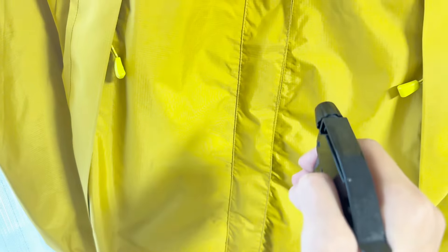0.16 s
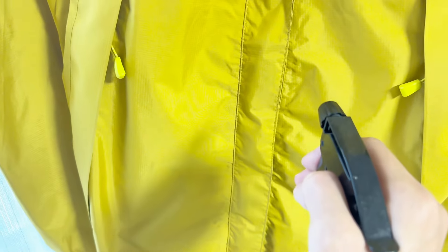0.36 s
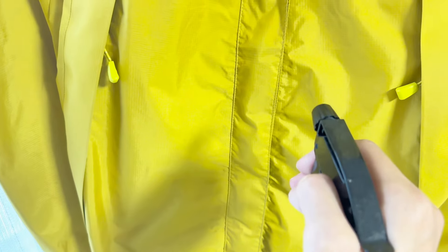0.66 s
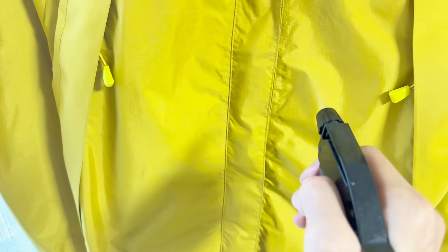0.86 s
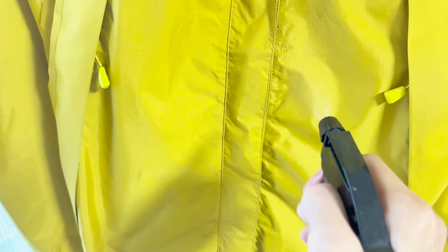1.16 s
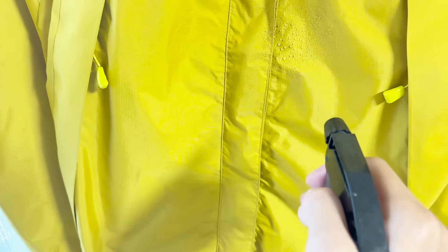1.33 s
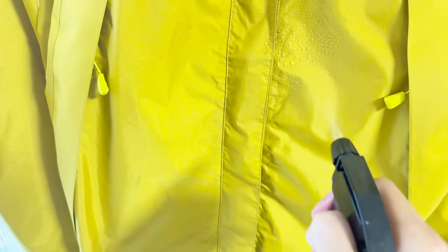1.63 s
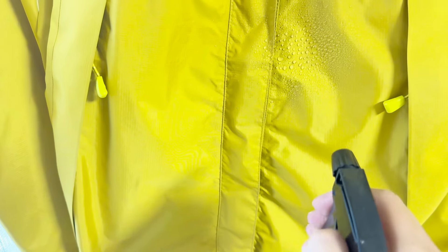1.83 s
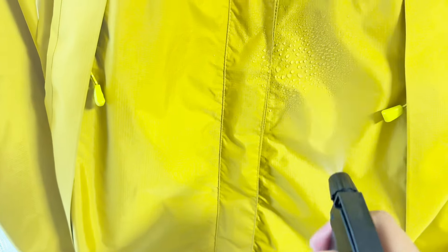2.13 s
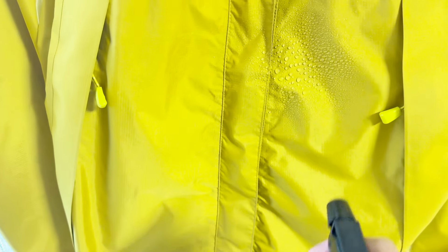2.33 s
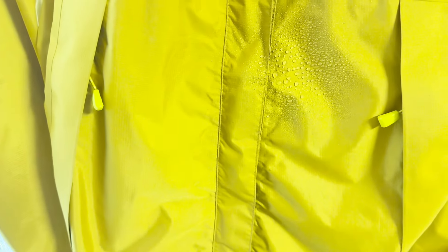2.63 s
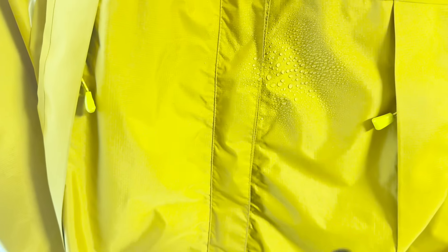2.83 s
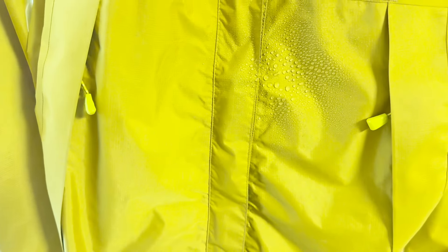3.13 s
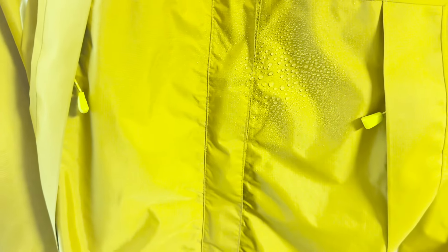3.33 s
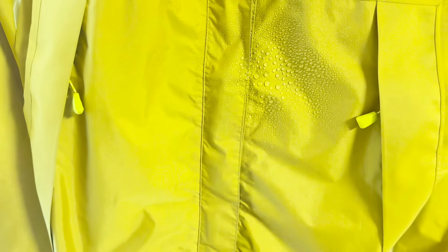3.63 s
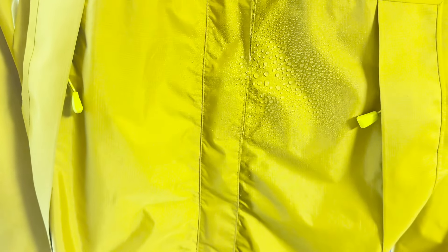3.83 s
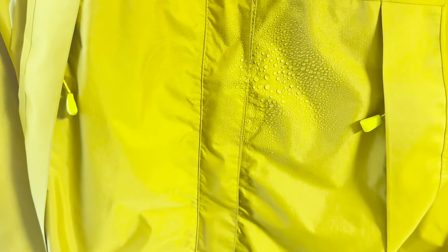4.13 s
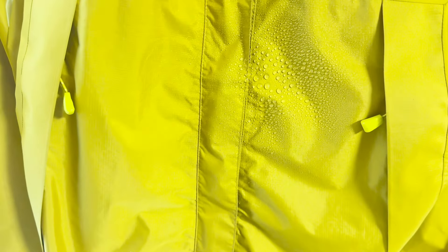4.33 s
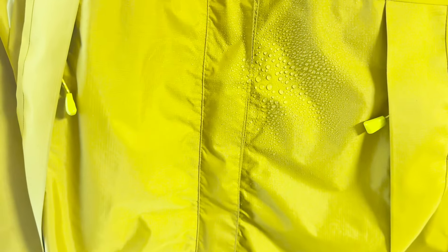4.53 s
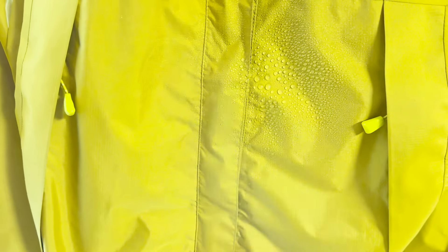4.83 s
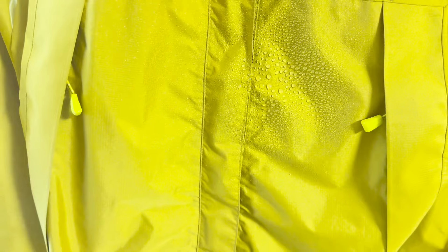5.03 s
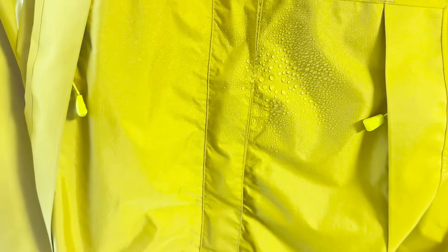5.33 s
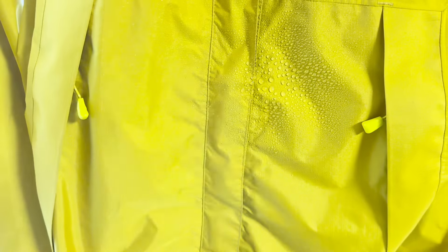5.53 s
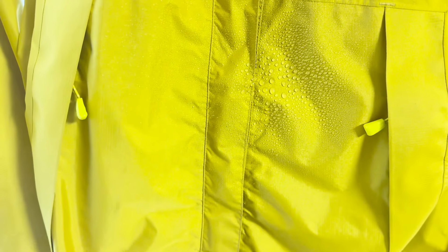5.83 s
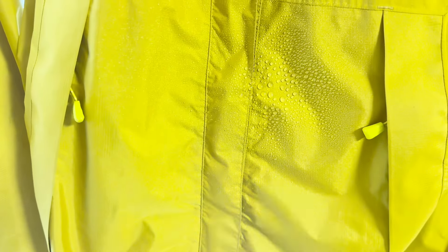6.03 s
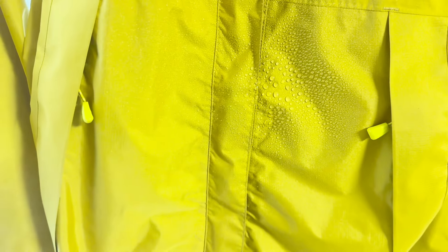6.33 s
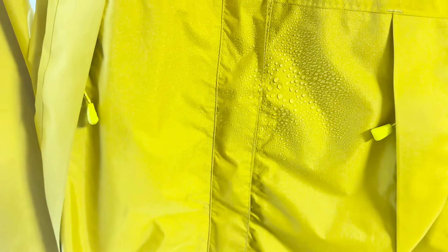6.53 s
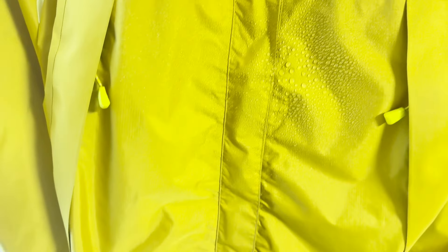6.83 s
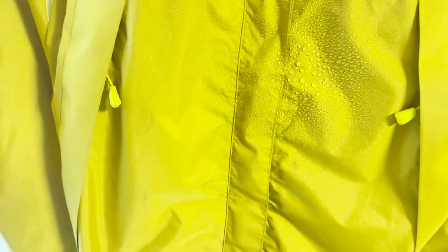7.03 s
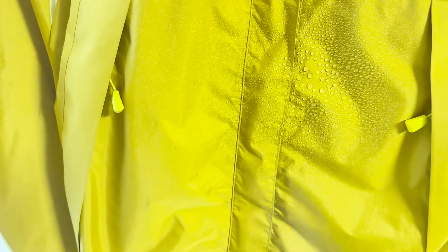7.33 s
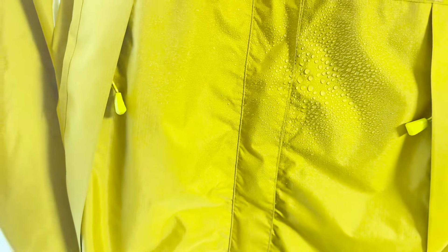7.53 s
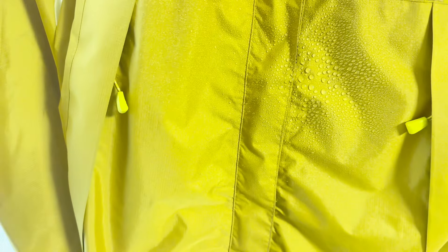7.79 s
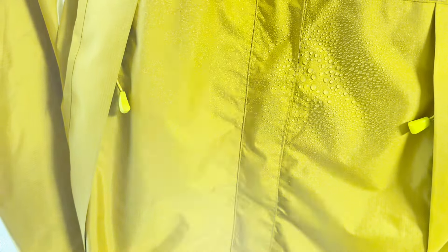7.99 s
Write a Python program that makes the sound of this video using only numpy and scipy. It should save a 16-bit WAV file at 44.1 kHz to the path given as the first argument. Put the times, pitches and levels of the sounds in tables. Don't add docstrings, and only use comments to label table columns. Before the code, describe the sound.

Close stereo phone pickup in a small room, beginning with faint air hiss and low street rumble. At about 0.7 seconds a hard plastic click starts the first trigger pull, a brief sputtering burst of air and water. More pulls come at 1.1, 1.5 and 2.1, spitting and clicking, with small wet crackles as the pump refills. A soft, bouncing low thud sounds in the building around 1.4. Cleaner, stronger hisses of mist follow at 2.9 and 3.5, with fine patter on nylon cloth, then a pause. Further squeezes come at 4.7, 5.4 and 6.0, each lasting roughly a quarter second and ending in a little suck or crackle. After another gap, sprays at 7.3 and 7.9 close the scene. Low machine hum swells around 5.6; traffic hiss rises near 6.4, and engine rumble is strongest at the end, about 8.2.

```python
import sys
import numpy as np
from scipy import signal
from scipy.fft import rfft, irfft, next_fast_len
from scipy.io import wavfile

SR = 44100
rng = np.random.default_rng(int(sys.argv[2]) if len(sys.argv) > 2 else 0)


def to_linear_factor(level_db):
    exponent = np.asarray(level_db, float) / 20
    return 10 ** exponent


def master_out(mix):
    frames = np.transpose(np.atleast_2d(mix))
    ceiling = np.clip(frames, -1, 1)
    pcm = np.round(ceiling * 32767).astype(np.int16)
    wavfile.write(sys.argv[1], SR, pcm)


N = 359718
TIME = np.arange(N) / SR
SLOW = TIME[::32]
HZ = np.maximum(np.fft.rfftfreq(2 * next_fast_len(N // 2 + SR // 8), 1 / SR), 1)

# pitch_hz, level_db (per Hz)
AIR_COLOUR = [(5000, -7.5), (7500, 0), (9000, -13), (13000, -11.5), (15000, -24.5)]
# pitch_hz, level_db (per Hz)
STREET_COLOUR = [(15, -37.5), (25, -13.5), (81, -0.5), (159, -11), (203, -11.5), (482, -19), (546, -24.5),
                 (1030, -21), (1240, -29.5), (2250, -29.5), (3400, -51.5), (4420, -70), (7480, -120)]
# pitch_hz, level_db (per Hz)
TYRE_HISS_COLOUR = [(1530, -32.5), (2600, 2.5), (3630, -7.5), (5080, -0.5), (7150, -5.5), (8510, -10.5),
                    (9990, -34.5), (11300, -34.5), (15100, -36.5), (16000, -32)]
# pitch_hz, likeness (-1 to 1)
STREET_LIKENESS = [(60, .98), (300, .86), (700, .55), (1500, .15), (4000, -.05), (8000, -.1), (10000, -.97),
                   (12000, -.5), (15000, .5)]
# pitch_hz, width_hz, boost_db
ROOM_MODES = [(61.6, 3.3, 12), (91.1, 2.7, 4), (129, 13, 7.5), (240, 9.1, -2.5)]
# time_s, level_db
ENGINES = [(0, -67.5), (.57, -62.5), (.79, -59), (1.18, -63), (1.43, -74), (1.6, -55.5), (2.68, -74.5),
           (3.34, -66.5), (3.7, -68.5), (4.2, -64), (4.6, -71.5), (5.2, -57.5), (5.7, -51.5), (6.04, -53),
           (6.5, -50.5), (7.3, -51.5), (7.6, -54.5), (8.157, -35.5)]
# time_s, level_db
TYRES = [(0, -77.5), (.6, -70), (1.4, -59), (1.95, -72.5), (2.45, -68.5), (2.67, -77), (3.3, -71.5),
         (4.05, -67.5), (4.5, -70.5), (5.15, -60), (5.3, -63), (5.95, -60), (6.37, -51), (6.6, -55),
         (7.0, -57.5), (7.3, -56), (7.7, -50), (8.157, -45)]
# middle_s, level_db, half_length_s
PASSES = [
    (2.5, -76, 0.064),
    (2.82, -76, .05),
    (3.95, -78.5, .12),
    (6.38, -50, 0.11),
    (6.8, -60.5, .12),
]
# pitch_hz, width_hz
HUM_LINES = [(200.2, 3.7), (307.1, 19), (88.2, 7), (1050, 500)]
# middle_s, level_db, half_length_s
HUM_SWELLS = [
    [(.82, -63.5, .25), (1.5, -64, 0.12), (2.18, -64, 0.14), (4.86, -59.5, 0.091), (5.6, -51.5, 0.18),
     (6.2, -55, 0.42), (6.9, -58, .3), (7.84, -40.5, 0.28)],
    [(.75, -61.5, 0.53), (1.57, -59, 0.17), (2.18, -60, .15), (4.9, -53.5, 0.12), (6.5, -63.5, 1),
     (8.1, -51.5, 0.37)],
    [(4.05, -63, 0.16), (5.1, -60, 0.18), (6.2, -47, 0.16), (6.75, -42, 0.1), (7.75, -39, 0.16),
     (8.1, -33, 0.19)],
    [(7.2, -59.5, 0.37), (7.8, -48.5, .25)],
]
# time_s, level_db
THUDS = [
    (1.376, -32),
    (1.404, -25),
    (1.443, -31.5),
    (1.47, -27.5),
    (1.514, -32.5),
    (1.939, -49.5),
    (5.2, -58),
]
# pitch_hz, level_db, time_to_fall_60_db_s
FLOOR_MODES = [(96.3, -7.5, 0.42), (133, -1.5, 0.29), (178.7, -11.5, 0.36), (853, -19.5, 0.071)]

# start_s, rise_s, hold_s, release_s (to lose 30 dB), hiss_level_db
PULLS = [(.742, 0.008, 0.023, .14, -33.5), (1.101, 0.0098, 0.064, 0.1341, -30.5),
         (1.5, 0.035, .05, 0.17, -30), (2.085, 0.027, 0.077, 0.1459, -27.5),
         (2.891, 0.062, 0.0334, 0.1618, -25.5), (3.501, 0.041, 0.028, 0.16, -25),
         (4.712, 0.051, 0.056, 0.1959, -28), (5.379, .05, 0.044, 0.1634, -28.5),
         (5.999, 0.036, 0.056, 0.1357, -25), (7.318, 0.051, 0.036, 0.18, -28.5),
         (7.933, 0.046, 0.048, 0.14, -24.5)]
# start_s, level_db
REFILLS = [
    (.722, -36),
    (.866, -38),
    (1.744, -50),
    (2.303, -43),
    (3.13, -52),
    (3.714, -44),
    (5.052, -48),
    (6.224, -50),
    (7.608, -58),
]
# start_s, knock_level_db, pitch_hz, air_share_db (spit over knock)
KNOCKS = [(0.666, -43, 1070, -21), (0.7196, -14.5, 1000, 7), (0.869, -33, 1166, 15),
          (2.078, -36.5, 1200, 1), (1.1477, -30, 1094, 12.5), (1.3204, -33.5, 1140, -11),
          (1.4724, -47, 810, 4), (1.5098, -31, 1565, 7), (1.7661, -30.5, 990, 2.5), (1.847, -48.5, 2474, 2),
          (1.8847, -48, 2545, -2), (2.1087, -30.5, 1982, 15.5), (2.151, -26.5, 1040, 19.5),
          (2.1809, -24.5, 1800, 23), (2.856, -33, 2710, -21.5), (2.8936, -43, 1200, -5),
          (3.0145, -29.5, 1970, 12.5), (3.244, -51.5, 3300, -6), (3.4805, -39.5, 2560, -13),
          (3.5018, -34.5, 1920, 15.5), (3.5274, -37.5, 2070, 18), (3.8087, -50, 3280, 0.5),
          (4.6401, -35.5, 2590, -25.5), (4.74, -36, 1860, 11.5), (5.3595, -52, 2700, -5),
          (5.4076, -28, 1770, 6), (5.711, -51, 3300, -8), (7.341, -37, 1880, 20), (7.916, -45, 2750, -10),
          (5.985, -40.5, 2540, -10)]
# start_s, level_db
SPITS = [(.7414, -19), (.7522, -9.5), (.7594, -9), (.7723, -10), (.7826, -10.5), (.838, -16.5),
         (.857, -22.5), (1.1034, -11.5), (1.119, -18.5), (1.131, -3), (1.172, -7), (1.1842, -5.5),
         (1.2182, -11.5), (1.2303, -19), (1.4997, -30.5), (1.635, -9), (1.6656, -10), (2.0817, -22),
         (2.9095, -16), (2.9394, -11), (2.9613, -22.5), (4.7087, -21), (4.7235, -14.5), (4.7721, -4),
         (4.9213, -20), (5.3803, -27), (6.0023, -19.5), (6.0447, -10), (7.3203, -41), (7.9359, -43)]
# start_s, level_db
CRACKLES = [(.9276, -32.5), (.9583, -34.5), (.978, -31.5), (1.0083, -33), (1.0784, -47.5), (1.3444, -34.5),
            (1.353, -36), (1.4325, -46), (1.7434, -23), (1.7751, -28.5), (1.794, -32), (2.3028, -17),
            (2.3216, -20), (2.338, -21), (2.4003, -42.5), (3.1301, -17), (3.1538, -22), (3.689, -22.5),
            (3.7155, -21), (3.7253, -26), (3.7373, -23.5), (4.9821, -25.5), (5.0524, -19), (5.057, -27),
            (5.0684, -17.5), (5.073, -24.5), (6.2239, -17), (6.228, -19), (6.2553, -26), (7.6086, -28)]
SHELL_HZ = (1000, 1950, 2580)
# pitch_hz, width_hz, and a table of time_s, level_db (over the patter)
RINGS = [
    (1800, 350, [(3.3, -17.5), (3.6, -11.5), (4.7, -6), (8.157, -5.5)]),
    (2700, 320, [(4.7, -15.5), (7.5, -9.5), (7.9, -1)]),
    (5400, 900, [(.8, 7), (1.2, 4.5), (1.6, -3.5), (2.2, -4.5), (3, -16)]),
]
# pitch_hz, level_db (per Hz)
JET_SUM = [(180, -48), (300, 7), (649, -8), (877, -4), (1830, -4), (2320, -7.5), (2650, -7.5), (3470, -6),
           (5830, 1.5), (7130, -1.5), (7890, 2.5), (9330, -4.5), (11400, 2.5), (15200, 4.5), (16500, -10.5)]
# pitch_hz, level_db (per Hz)
JET_DIFFERENCE = [(180, -54), (300, -15), (1040, -20), (2130, -9.5), (2890, -19.5), (3650, -10.5),
                  (5740, -1.5), (6670, -7), (7760, 4), (8730, 1.5), (12000, 2), (15400, -9), (16500, -29)]
# pitch_hz, share_in_step, share_quarter_cycle_off (the rest is unrelated)
PORTS = [(300, .4, .5), (1200, 0.633, 0.75), (2210, 0.31, 0.68), (4560, 0.21, .6), (7500, 0.64, .8),
         (9000, 0.12, 0.99), (14930, 0., .8)]
# start_s, end_s, pitch_hz, width_hz
NULLS = [(.76, .85, 8800, 700), (1.2, 1.32, 9300, 600), (1.54, 1.63, 9300, 600), (1.7, 1.73, 9200, 600),
         (2.19, 2.28, 9000, 500), (2.96, 3.1, 9600, 600), (3.56, 3.68, 9700, 600), (4.8, 4.97, 9500, 600),
         (5.44, 5.65, 9500, 600), (6.02, 6.21, 9300, 700), (7.4, 7.58, 9400, 600), (8.0, 8.157, 9600, 600)]
# pitch_hz, left_minus_right_db
LEFT_PORT = [(300, 1.6), (2200, 3), (3500, 0), (5000, 9), (8000, 11), (9500, 0)]


def across(table, column):
    table = np.array(table, float)
    return np.interp(np.log(HZ), np.log(table[:, 0]), table[:, column])


def shape(x, gain):
    size = 2 * (len(HZ) - 1)
    return irfft(rfft(x, size) * gain, size)[..., :N]


def unit(x):
    return x / np.sqrt(np.mean(x ** 2))


def below(hz):
    return 1 / np.sqrt(1 + (HZ / hz) ** 8)


def above(hz):
    return np.sqrt(1 - below(hz) ** 2)


def peak(hz, width_hz):
    return 1 / (1 + (2 * (HZ - hz) / width_hz) ** 2)


def walk(rate_hz):
    size = next_fast_len(len(SLOW))
    hz = np.fft.rfftfreq(size, SLOW[1])
    slow = irfft(rfft(rng.standard_normal(size)) * np.exp(-(hz / rate_hz) ** 2), size)
    return np.interp(TIME, SLOW, unit(slow[:len(SLOW)]))


def swells(rows):
    power = sum(to_linear_factor(db) ** 2 * np.exp(-((SLOW - s) / half_s) ** 2) for s, db, half_s in rows)
    return np.interp(TIME, SLOW, np.sqrt(power))


def null(hz, centre_hz, width_hz):
    return to_linear_factor(-35 * np.exp(-((hz - centre_hz) / width_hz) ** 4))


def air():
    mid, side = shape(rng.standard_normal((2, N)), to_linear_factor(across(AIR_COLOUR, 1)))
    mid = shape(mid, null(HZ, centre_hz=9800, width_hz=800))
    return to_linear_factor(-78) * unit(np.array([mid + side, mid - side]))


def street_db():
    engines = np.interp(TIME, *np.transpose(ENGINES))
    tyres = np.interp(TIME, *np.transpose(TYRES))
    rumble = engines + 2.5
    drone = -61 + 0.84 * (engines + 60)
    hiss = np.hypot(to_linear_factor(-86 + tyres + 70), swells(PASSES))
    return rumble, drone, tyres, 20 * np.log10(hiss)


def traffic():
    lift_db = sum(db * peak(hz, width_hz) for hz, width_hz, db in ROOM_MODES)
    low = to_linear_factor(across(STREET_COLOUR, 1) + lift_db)
    top = to_linear_factor(across(TYRE_HISS_COLOUR, 1))
    alike = np.clip(across(STREET_LIKENESS, 1), -.99, .99)
    side_share = np.sqrt((1 - alike) / (1 + alike))
    bands = [low * below(155.),
             low * above(155.) * below(520.),
             low * above(520.) * below(3000.),
             top * above(3000.)]
    flickers_db = (1.99, 2.2, 1.2, 0.51)
    out = 0
    for band, db, flicker_db in zip(bands, street_db(), flickers_db):
        mid = shape(rng.standard_normal(N), band)
        side = shape(rng.standard_normal(N), band * side_share)
        gain = to_linear_factor(db + flicker_db * walk(8.)) / np.std(mid)
        out = out + gain * np.array([mid + side, mid - side])
    return out


def hum():
    out = 0
    for (hz, width_hz), rows in zip(HUM_LINES, HUM_SWELLS):
        line = unit(shape(rng.standard_normal(N), peak(hz, width_hz)))
        load = np.hypot(to_linear_factor(-77.5), swells(rows))
        out = out + line * load * to_linear_factor(-2.5)
    return out


def thuds():
    blows, t = np.zeros(N), TIME[:SR // 2]
    for s, db in THUDS:
        blows[int(s * SR)] = to_linear_factor(db)
    ring = sum(to_linear_factor(db) * np.sin(2 * np.pi * hz * t) * 1000 ** (-t / t60_s) for hz, db, t60_s in FLOOR_MODES)
    soft_start = 1 - np.exp(-t / .005)
    return signal.fftconvolve(blows, ring * soft_start)[:N]


def room(x):
    t60_s, level_db = 0.32, -9.5
    t = TIME[:SR // 2]
    tails = rng.standard_normal((2, len(t))) * 1000 ** (-t / t60_s) * (t > .004)
    tails = tails / np.sqrt(np.sum(tails ** 2, axis=1, keepdims=True))
    echo = signal.fftconvolve(x, tails, axes=1)[:, :N]
    return to_linear_factor(level_db) * shape(echo, below(3700.0))


def drop_bands(near):
    mid = near.copy()
    for start_s, end_s, centre_hz, width_hz in NULLS:
        span = slice(int(start_s * SR), int(end_s * SR))
        size = len(near[span])
        hz = np.fft.rfftfreq(size, 1 / SR)
        lost = rfft(near[span]) * (1 - null(hz, centre_hz, width_hz))
        mid[span] -= irfft(lost, size) * signal.windows.tukey(size, .1)
    return mid


def ports(near, other):
    step = np.clip(across(PORTS, 1), -.7, .7)
    quarter = np.clip(across(PORTS, 2), -1, 1) * np.sqrt(1 - step ** 2)
    rest = np.sqrt(np.maximum(1 - step ** 2 - quarter ** 2, 0))
    apart = to_linear_factor(across(JET_DIFFERENCE, 1) - across(JET_SUM, 1) + 3.5)
    side = shape(near, apart * (step + 1j * quarter)) + shape(other, apart * rest)
    mid = drop_bands(near)
    return np.array([mid + side, mid - side])


def events():
    rows = [(s, db + air_db, db, hz) for s, db, hz, air_db in KNOCKS]
    shell_knock_db = -25.5
    for table in (SPITS, CRACKLES):
        for k, (s, db) in enumerate(table):
            rows.append((s, db, db + shell_knock_db, SHELL_HZ[k % len(SHELL_HZ)]))
    return rows


def ticks():
    spit, scrape, knock = np.zeros((3, N))
    t = TIME[:2000]
    for s, spit_db, knock_db, hz in events():
        span = slice(int(s * SR), int(s * SR) + len(t))
        spit[span] += to_linear_factor(spit_db - 6.5) * t / .001 * np.exp(-t / 0.0011)
        scrape[span] += to_linear_factor(knock_db - 2) * t / 0.0032 * np.exp(-t / 0.0024)
        knock[span] += to_linear_factor(knock_db + 1) * np.sin(2 * np.pi * hz * t) * 1000 ** (-t * hz / 15.)
    return spit, scrape, knock


def pressure():
    hiss, patter = np.zeros((2, len(SLOW)))
    for k, (s, rise_s, hold_s, release_s, db) in enumerate(PULLS):
        started = SLOW > s
        closed = np.clip(1 - (SLOW - s) / rise_s, 0, 1)
        released = np.maximum(SLOW - s - rise_s - hold_s, 0) / release_s
        hiss += to_linear_factor(db - 24 * closed - 30 * released ** 1.176) * started
        unwetted = np.clip(1 - (SLOW - s) / max(rise_s, 0.04), 0, 1)
        wet_db = -33.5 - 2 * np.exp(-k / 1.8)
        patter += to_linear_factor(wet_db - 21.5 * unwetted - 25 * released) * started
    fall_db_s = 552.5
    refill = sum(to_linear_factor(db - fall_db_s * np.abs(SLOW - s)) * (SLOW > s) for s, db in REFILLS)
    return np.interp(TIME, SLOW, hiss + refill), np.interp(TIME, SLOW, patter + refill * to_linear_factor(-8))


def grainy(rate_hz, flicker_db, share):
    drops = to_linear_factor(3.5 * np.minimum(rng.exponential(size=N), 7)) * share
    return rng.standard_normal(N) * to_linear_factor(flicker_db * walk(rate_hz)) * (1 + drops)


def rings(patter, hiss, wet):
    out = 0
    for hz, width_hz, curve in RINGS:
        ring = unit(signal.lfilter(*signal.iirpeak(hz, hz / width_hz, SR), patter + hiss))
        level_db = np.interp(TIME, *np.transpose(curve))
        out = out + ring * to_linear_factor(level_db + 2.5 * walk(25.))
    return out * wet / wet.max()


def bottle():
    colour = to_linear_factor(across(JET_SUM, 1))
    spit, scrape, knock = ticks()
    flutter = to_linear_factor(0.66 * walk(61.0))
    jet, wet = pressure()
    pair = []
    for _ in range(2):
        hiss = unit(shape(grainy(330.0, 1.3, 0.19), colour * above(2500.0)))
        patter = unit(shape(grainy(150., 2.9, 0.23), colour * below(3100.0) * above(720.0) ** 2))
        drum = unit(shape(rng.standard_normal(N), above(220.0) * below(650.)))
        patter = patter + to_linear_factor(-19.5) * drum
        patter = patter + rings(patter, hiss, wet)
        burst = rng.standard_normal(N)
        bright = unit(shape(burst, colour * above(3000.))) * spit
        dull = unit(shape(burst, colour * below(3200.))) * scrape
        pair.append((hiss * jet + patter * wet) * flutter + bright + dull + knock)
    return ports(*pair)


def scene():
    far = air() + traffic() + hum() + thuds()
    near = bottle()
    left_right_db = np.outer([.35, -.65], across(LEFT_PORT, 1))
    return near + room(near) + shape(far, to_linear_factor(left_right_db))


def roll_off(x):
    return signal.sosfilt(signal.butter(12, 16970, fs=SR, output="sos"), x)


def record(dry):
    top_db = -31.5 / (1 + np.exp((15800 - HZ) / 60.))
    mix = shape(dry, to_linear_factor(top_db) * above(32.0))
    return roll_off(mix)


dry = scene()
out = record(dry)
master_out(out)
```